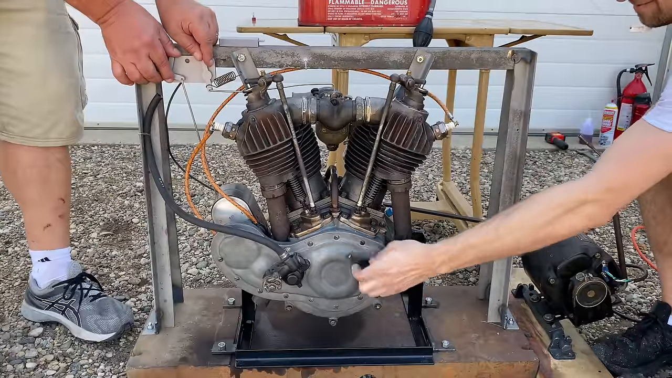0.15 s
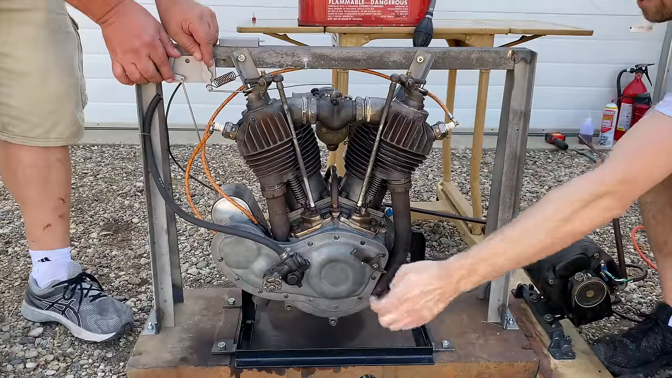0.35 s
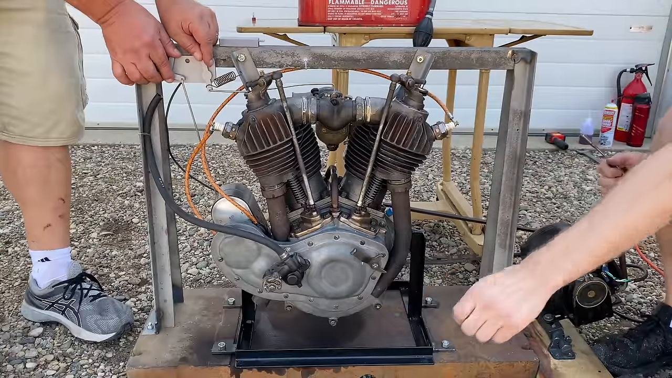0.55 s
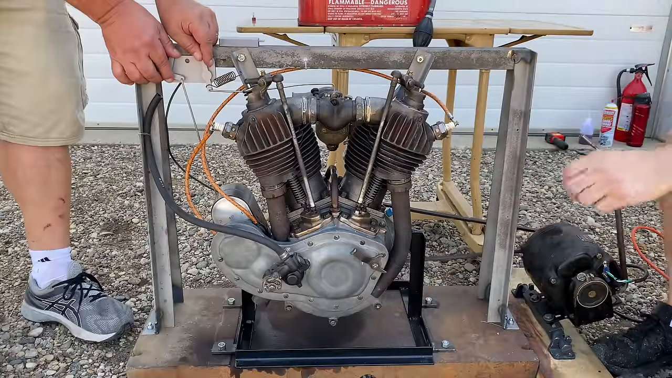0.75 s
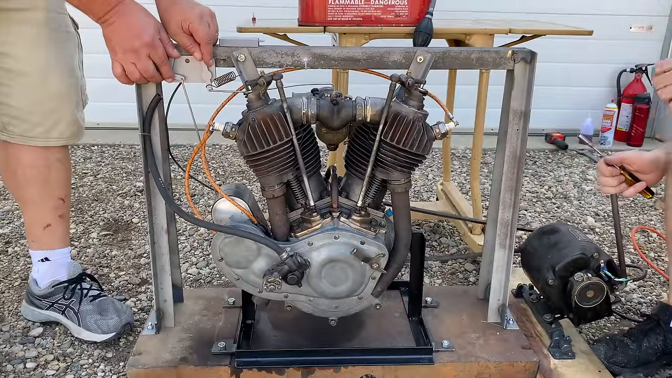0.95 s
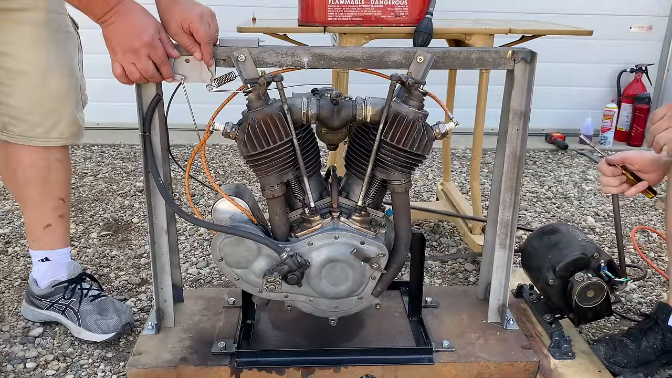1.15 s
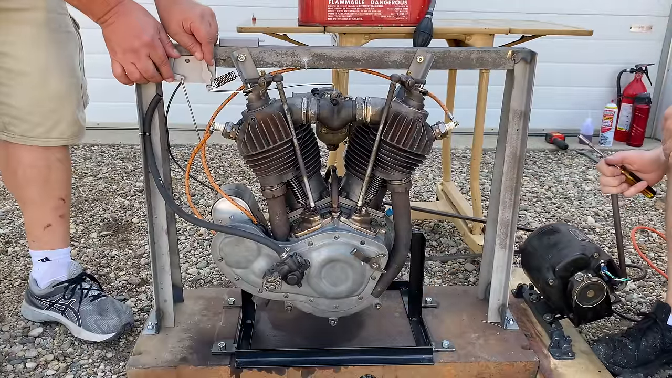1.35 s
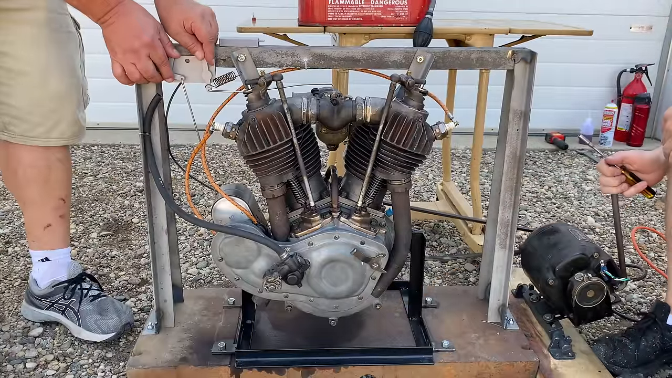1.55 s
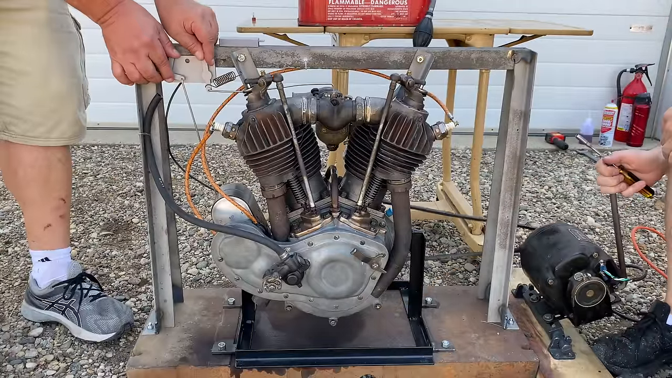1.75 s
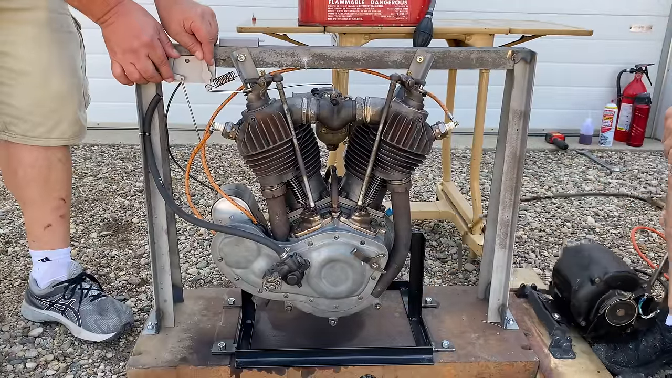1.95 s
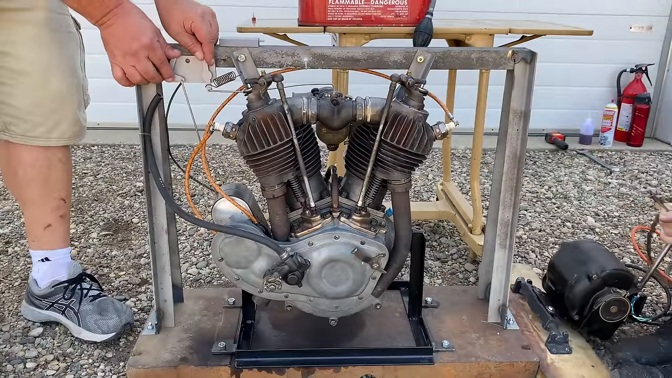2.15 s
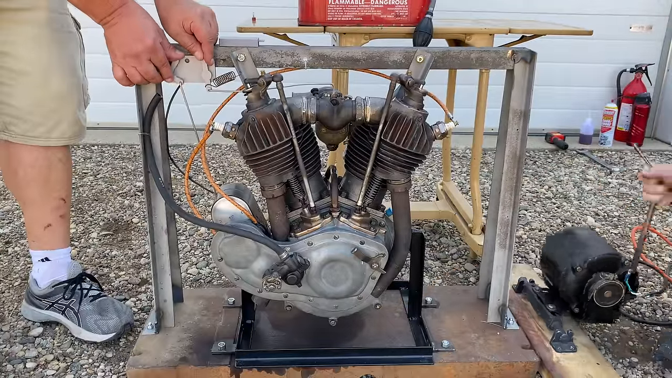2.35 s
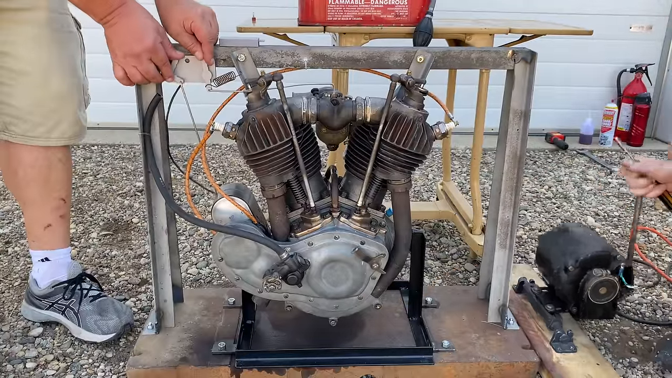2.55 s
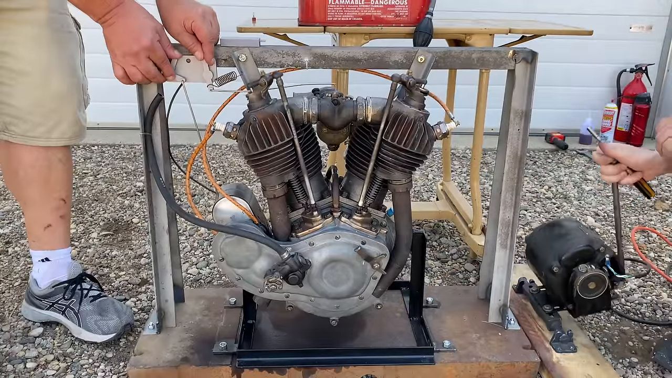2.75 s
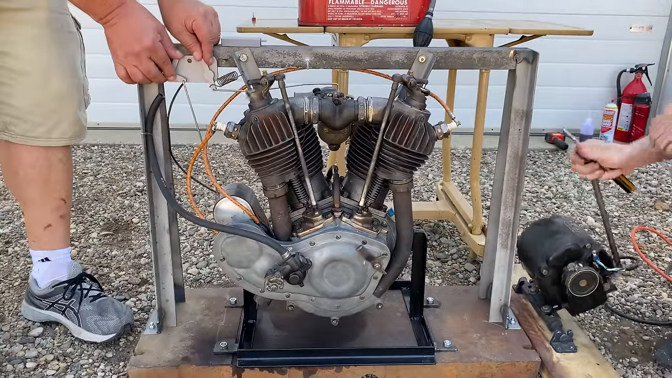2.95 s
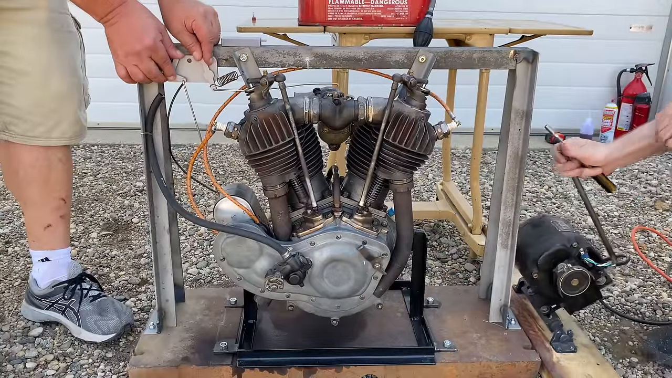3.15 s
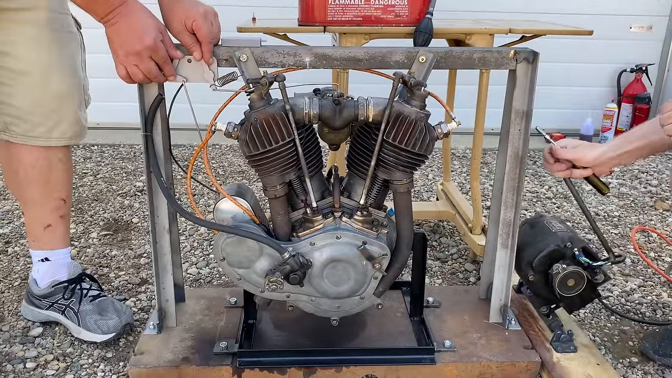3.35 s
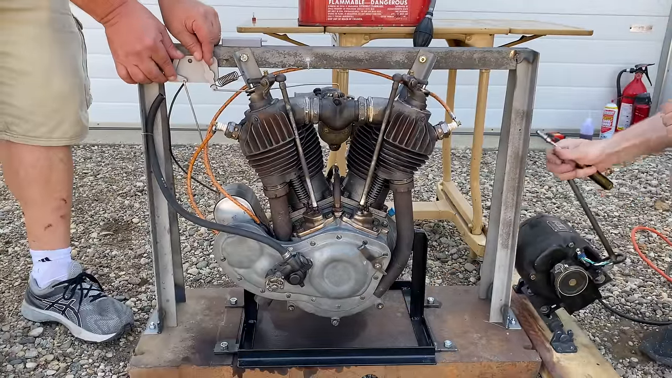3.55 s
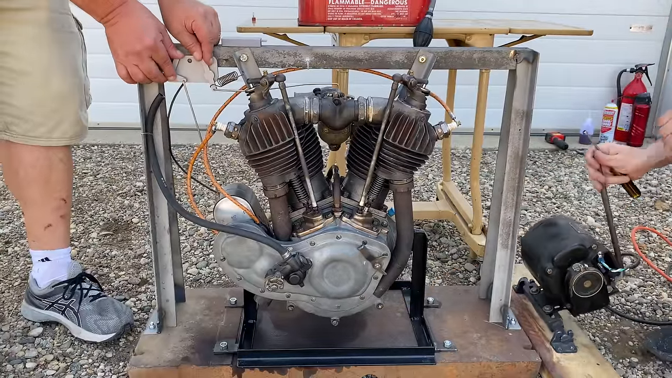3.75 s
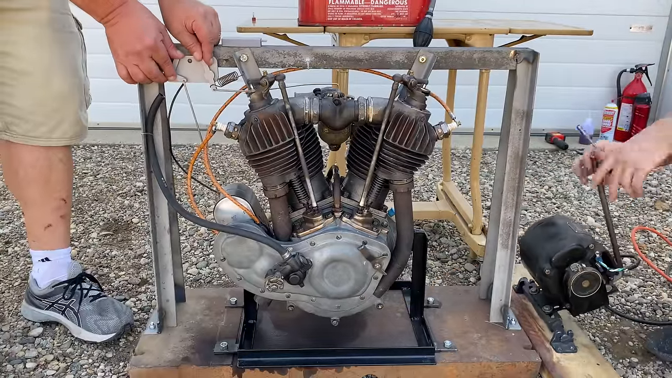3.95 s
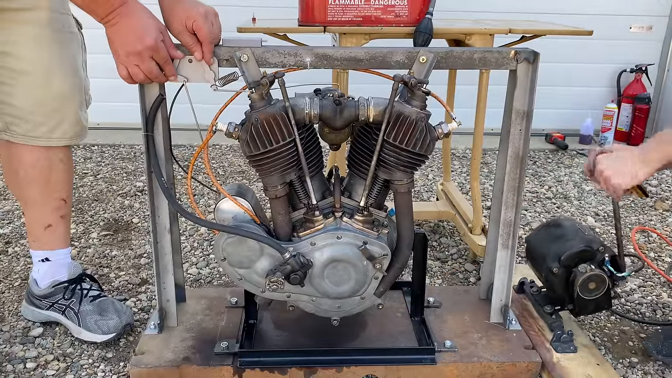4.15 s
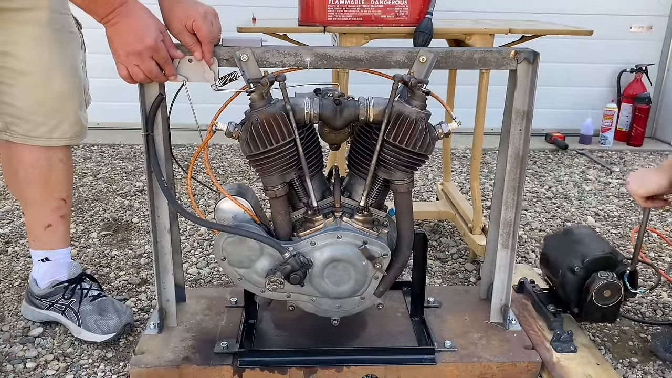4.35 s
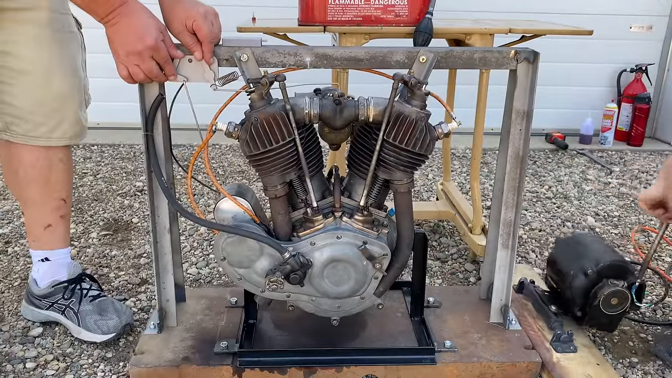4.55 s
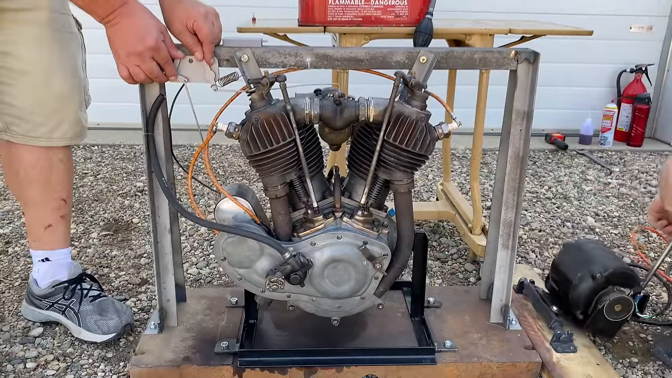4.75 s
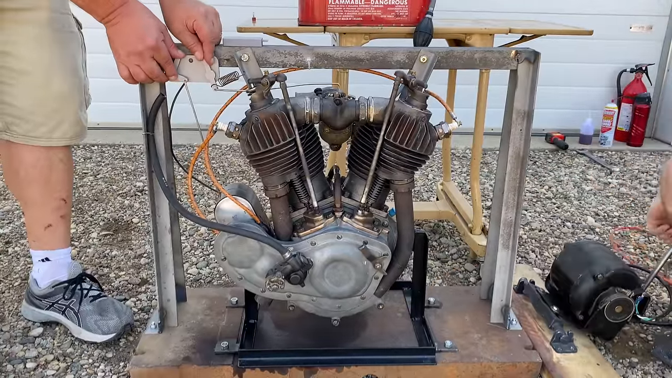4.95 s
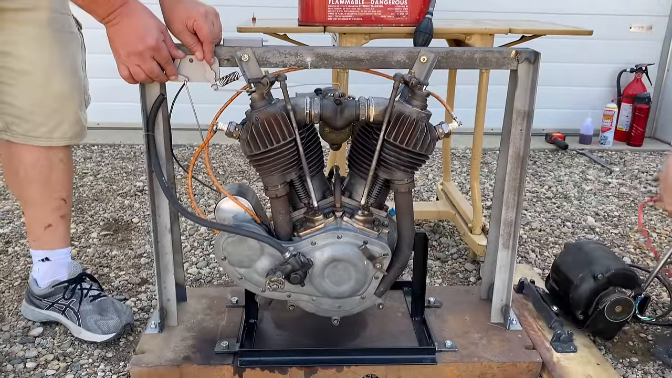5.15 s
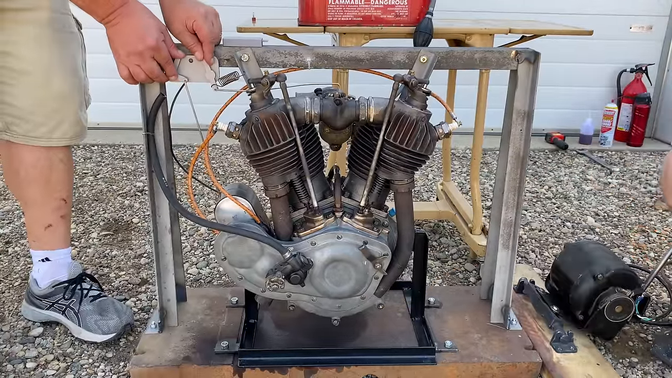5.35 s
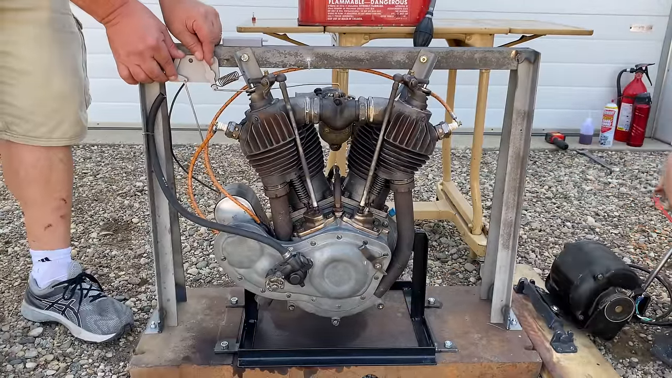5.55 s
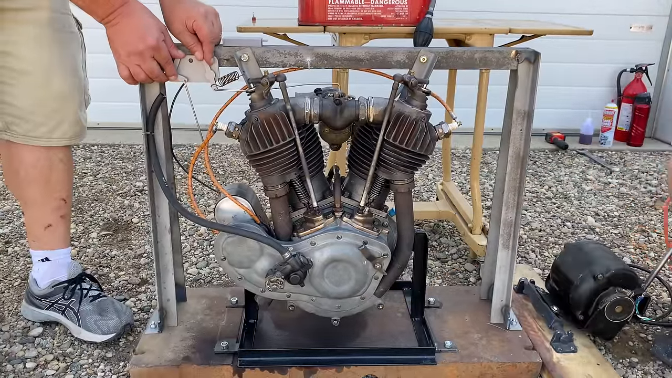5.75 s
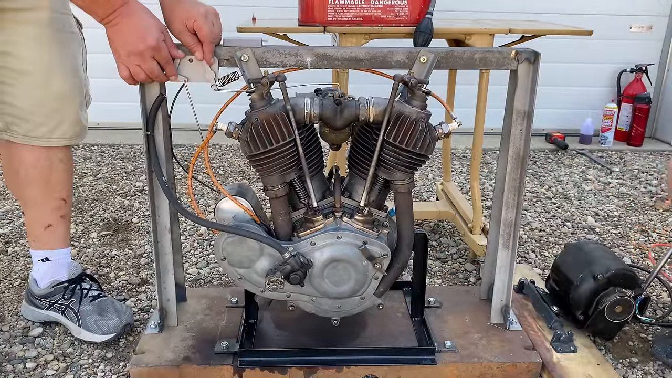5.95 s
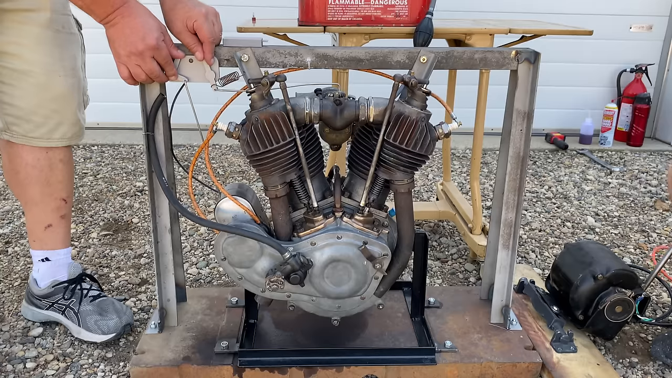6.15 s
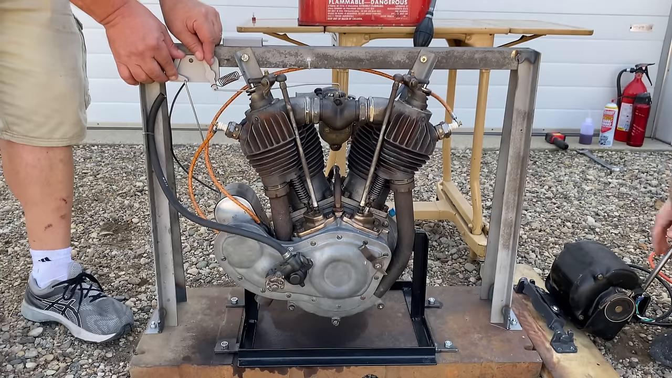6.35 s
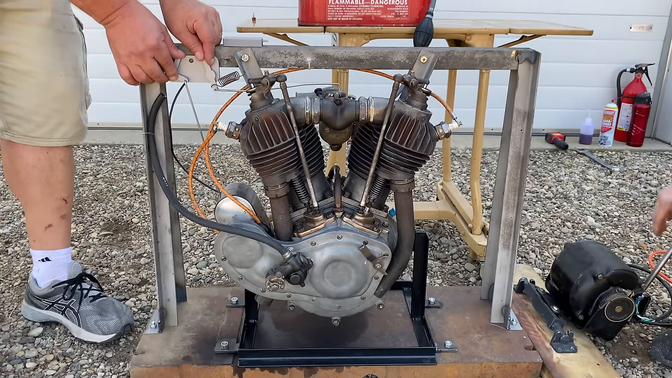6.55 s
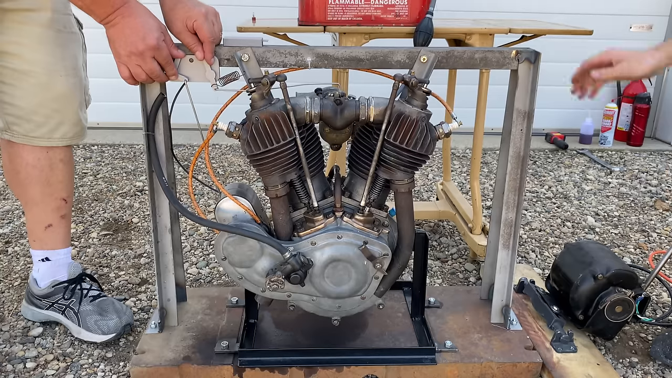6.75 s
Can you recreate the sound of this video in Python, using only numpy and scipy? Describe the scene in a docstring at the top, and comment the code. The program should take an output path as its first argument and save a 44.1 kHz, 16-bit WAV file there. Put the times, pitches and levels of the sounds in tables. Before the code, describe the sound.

An old V-twin engine is cranked with rubbing, ticking and hollow puffs, coughs twice, catches, then runs loud and lumpy outdoors.

```python
"""V-twin on a test stand

An electric motor spins an old V-twin on a steel stand outdoors on gravel: rubbing noise excites the castings,
each slow cycle has the same round of ticks, resonant noise bursts, and nearly all pump two hollow gliding puffs.
It coughs, catches, flares and runs on short open pipes: each firing is a thump in a jet of noise, and at speed
a swell of pipe resonances; some charges misfire. Gravel and a garage door answer faintly with decaying noise."""
import sys
import numpy as np
from scipy import signal
from scipy.fft import rfft, irfft, next_fast_len
from scipy.io import wavfile
from scipy.ndimage import uniform_filter1d

SR = 44100
rng = np.random.default_rng(int(sys.argv[2]) if len(sys.argv) > 2 else 0)


def digitize_waveform(pressure):
    """Quantize a signal to 16-bit integers and store it at the path in sys.argv[1].

    Rows of a 2-D input are taken as channels; values are limited to [-1, 1].
    """
    field = np.atleast_2d(pressure).T
    bounded = np.clip(field, -1, 1)
    quanta = np.round(bounded * 32767).astype(np.int16)
    wavfile.write(sys.argv[1], SR, quanta)


N = 299880

# crank progress from the moment the engine catches: time_s, four_stroke_cycles_done
CRANK_PROGRESS = [(1.9365, 0), (2.2278, 2), (2.3328, 3), (2.7992, 9), (3.3517, 17), (3.7787, 23),
                  (4.1273, 28), (4.2696, 30), (4.9618, 40), (5.9848, 55), (6.052, 56), (6.1843, 58),
                  (6.7826, 67)]
CATCH_S = CRANK_PROGRESS[0][0]
# lag of the second cylinder behind the first, as a share of the cycle
V_LAG = 315 / 720
# charges that burn badly or not at all: time_s, level_db (against a full firing)
MISFIRES = [(2.898, -9), (3.035, -35), (3.172, -10), (3.382, -41), (3.526, -7.5), (4.229, -6.5),
            (4.269, -38), (4.649, -32), (4.922, -38), (5.196, -38), (5.335, -6), (5.471, -30), (5.810, -37),
            (6.478, -31), (6.612, -31), (6.745, -7.5)]
# first and second cylinder when firing: crack_db, length_ratio, thump_db
CYLINDERS = [(2.5, 0.94, -12), (0.5, 1.29, -25)]
# lone firings while cranking: time_s, level_db, length_ratio (against a running firing), thump_db
COUGHS = [(0.795, 3.5, 2.5, -10.5), (1.81, -1, 2.9, -2.5)]
# gas column in cylinder and pipe at the idle rate: pitch_hz, level_db, fullest_s, steepness (of the swell)
PIPE_MODES = [(59.7, -19, 0.016, 2.6), (103.7, -14.5, 0.014, 4.8), (156, -28.5, 0.023, 2.9),
              (204, -26, 0.018, 3), (229.8, -32, 0.026, 4.7), (258.8, -22, 0.018, 7.4),
              (373.7, -26.5, 0.0055, 2.2)]
# slow cycles on the starter: start_s (first exhaust valve opens), first_puff_db, second_puff_db
SLOW_CYCLES = [(.317, -12, -16.5), (.668, -11.5, -8.5), (1.0, -17.5, -13), (1.342, -15.5, -20),
               (1.691, -15.5, -9.5)]
# puff of each cylinder on the starter: length_s
PUFF_LENGTHS = [.1, 0.075]
# rockers and tappets in every slow cycle: cycle_share, level_db (before load and scatter)
TICKS = [(.125, -31), (.25, -23), (.434, -24.5), (.66, -31), (.94, -30)]
# scrape of cams and linkage: cycle_share, level_db (before load), centre_hz, length_s
SCRAPES = [(0.391, -36.5, 257, 0.018), (0.398, -38.5, 640, 0.021), (0.832, -39.5, 825, 0.019),
           (0.966, -33.5, 245, 0.0099)]
# rubbing of the drive, hardest against each compression: cycle_share, level_db (before load)
DRAG = [(0, -36), (.17, -41), (.42, -33.5), (.6, -39), (.78, -38.5)]
# resonances of crankcase and fins: centre_hz, width_hz, level_db
CASTING_MODES = [(541, 86, 9), (1190, 540, -13.5), (2384, 22, 14.5), (2770, 280, -3), (3937, 230, 7.5),
                 (3910, 42, -1), (4180, 94, 1), (6200, 490, -3)]
# ringing modes of the steel stand: pitch_hz, level_db, t60_s
STAND_MODES = [(230, 1, 0.36), (2380, -12, 0.26), (3600, -8, 0.24), (4040, -34, 1.9), (5640, -9, 0.19)]
# spectrum of rubbing metal: frequency_hz, level_db
RUB_SPECTRUM = [(30, -24), (90, 1), (240, 5), (350, -3.5), (520, 6), (900, 1.5), (1200, 4.5), (1800, 0),
                (4000, -0.5), (7000, -7), (10000, -6.5), (15000, -11)]
# spectrum of escaping gas: frequency_hz, level_db
JET_SPECTRUM = [(30, 1), (130, 5.5), (250, 5.5), (420, 3), (650, -0.5), (950, -3.5), (1600, -5.5),
                (2500, -1), (3300, -5), (5000, -7), (8000, -11.5), (10000, -10.5), (14000, -15),
                (16000, -20.5)]
# spectrum of the shaking stand: frequency_hz, level_db
SHAKE_SPECTRUM = [(15, -52), (35, -10), (70, 6.5), (200, 14), (330, -1.5), (600, -7.5), (2000, -62)]
# phase between the two microphone ports: frequency_hz, left_lead_rad
PORT_PHASE = [(100, 0), (700, .4), (1800, -.2), (2200, 1.5), (2800, 2.7), (3600, 2.2), (4400, 1.4),
              (5100, 1.8), (5500, 4), (6500, 6.6), (7700, 9.7), (9000, 7.6), (10000, 6.3), (12100, 3.1),
              (13900, 0), (15900, -3.1)]
# likeness of noise at the two ports: frequency_hz, correlation
PORT_LIKENESS = [(100, 0.76), (300, 0.84), (600, 0.6), (1200, 0.43), (2500, 0.3), (4500, 0.45),
                 (8000, 0.39), (12000, 1)]
# level between the ports: frequency_hz, left_minus_right_db
PORT_LEAN = [(40, 8), (100, -3.5), (250, -1), (500, 0.5), (1000, 0.8), (3000, -3), (9000, -0.6)]
# decay of the yard's answer: frequency_hz, t60_s
YARD_DECAY = [(150, 0.13), (1500, 0.15), (12000, 0.011)]

TOP_HZ = 16300  # upper end of the band
# the engine flares up as it catches: settling time, then extra level of crack and boom
FLARE_S, FLARE_CRACK_DB, FLARE_BOOM_DB = 0.81, 4.5, 5.5
# cycles a second: the pipe pitches' reference, then the range where separate puffs merge into a boom
IDLE_RATE, PUFF_RATE, BOOM_RATE = 14.5, 7.4, 11.2
FIRST_CYCLE_S = -.02  # start of the cycle before the listed ones, which has ticks and scrapes but no puffs
# a puff glides from one pitch (before its waver), further when the gas is hot; cold ends are per cylinder
PUFF_HZ, COLD_END_HZ, HOT_END_HZ = 89, [198, 161], 289
EASE_DB_PER_S = 3.5  # the mechanism quietens as it frees up
SLACK_DB, SLACK_S = 5, 0.15  # after a cough the engine briefly outruns the drive


def amp(db):
    """Level: decibels become a pressure ratio."""
    return 10 ** (np.asarray(db) / 20)


def unit(x):
    """Normalisation: a signal is scaled to rms 1."""
    return x / np.sqrt(np.mean(x ** 2) + 1e-20)


def along(points, hz):
    """Interpolation of (frequency, value) points on a logarithmic frequency axis."""
    f, v = np.transpose(points)
    return np.interp(np.log(hz + 1), np.log(f + 1), v)


def filtered(x, response):
    """Linear filtering: the spectrum is multiplied by a complex response."""
    size = next_fast_len(N + SR // 2)
    hz = np.fft.rfftfreq(size, 1 / SR)
    return irfft(rfft(x, size) * response(hz), size)[..., :N]


def add(track, s, sound):
    """Superposition: a sound is summed into the track from time s on."""
    part = track[..., max(round(s * SR), 0):][..., :sound.shape[-1]]
    part += sound[..., :part.shape[-1]]


def band(hz, centre_hz, width_hz):
    """Resonance: one broad peak in frequency."""
    return 1 / (1 + ((hz - centre_hz) / width_hz) ** 2)


def mottle(hz, depth_db, count=28):
    """Spectral variation: a random ripple, weaker in the bass, colours each burst differently."""
    knots = np.linspace(0, np.sqrt(TOP_HZ), count)
    ripple = np.interp(np.sqrt(hz), knots, rng.standard_normal(count))
    return amp(depth_db * ripple * hz / (hz + 400))


def flutter(depth_db, size):
    """Amplitude modulation: a random gain of rms 1 changes about every size samples."""
    drift = unit(uniform_filter1d(rng.standard_normal(N), size))
    return unit(amp(depth_db * drift))


def rush(colour, size=N):
    """Partial coherence: mid and side noise of one colour give two channels of set likeness, rms 1."""
    hz = np.fft.rfftfreq(size, 1 / SR)
    turn = np.arccos(np.clip(along(PORT_LIKENESS, hz), 0, 1)) / 2
    weights = np.array([np.cos(turn), np.sin(turn)])
    noise = rfft(rng.standard_normal((2, size)))
    mid, side = irfft(noise * colour(hz) * weights, size)
    return unit(np.array([mid + side, mid - side]))


def swish(centre_hz, length, relative_width=0.25):
    """Resonant friction or flow noise: one swell, centred in a fifth of a second."""
    t = np.arange(-SR // 10, SR // 10) / SR
    noise = rush(lambda hz: band(hz, centre_hz, relative_width * centre_hz), len(t))
    return np.exp(-(t / length) ** 2) * noise


def crank_time(cycles):
    """Flywheel inertia: a natural cubic spline gives the times at which the engine reaches these cycles."""
    s, knots = np.transpose(CRANK_PROGRESS)

    def basis(c):
        """Spline basis: cubic distances to the knots plus a straight line."""
        return np.c_[abs(c[:, None] - knots) ** 3, np.ones(len(c)), c]

    rows = basis(knots)
    ends = np.c_[rows[:, -2:].T, np.zeros((2, 2))]
    weights = np.linalg.solve(np.r_[rows, ends], np.r_[s, 0, 0])
    return basis(cycles) @ weights


def firings():
    """Firing order: time, burn (dB) and cycle rate of each exhaust stroke; the V angle makes the beat limp."""
    whole = np.arange(CRANK_PROGRESS[-1][1] + 1)
    cycles = np.sort(np.r_[whole, whole[:-1] + V_LAG])
    times = crank_time(cycles)
    burn_db = np.zeros(len(times))
    for s, db in MISFIRES:
        burn_db[np.argmin(abs(times - s))] = db
    speed = .5 / (crank_time(cycles + .5) - times)
    return times, burn_db, speed


def flare(s):
    """Exponential settling: 1 as the engine catches, falling towards 0."""
    return np.exp(-(s - CATCH_S) / FLARE_S)


def merged(speed):
    """Fusion of pulses: 0 while strokes puff one by one, 1 when they are fast enough to boom."""
    return np.clip((speed - PUFF_RATE) / (BOOM_RATE - PUFF_RATE), 0, 1)


def turn_starts():
    """Periodicity: boundaries of the slow cycles, up to the moment the engine catches."""
    return np.r_[FIRST_CYCLE_S, np.transpose(SLOW_CYCLES)[0], CATCH_S]


def each_turn(share):
    """Cam timing: the moment in every slow cycle at which this share of it has passed."""
    starts = turn_starts()
    return starts[:-1] + share * np.diff(starts)


def load_db(s):
    """Mechanical load: the drive eases steadily and goes slack after each exhaust cough."""
    slack = sum((s > start) & (s < start + SLACK_S) for start, *_ in COUGHS)
    return EASE_DB_PER_S * (1 - s) - SLACK_DB * slack


def drag_db(s):
    """Friction under load: the rubbing level follows cam position and load."""
    starts = turn_starts()
    position = np.interp(s, starts, np.arange(len(starts)))
    return np.interp(position, *np.transpose(DRAG), period=1) + load_db(s)


def yard(x, delay=.008):
    """Scattering: gravel and garage door answer with noise that decays at a rate set by frequency."""
    hz, t, z = signal.stft(rng.standard_normal((2, SR // 3)), SR, nperseg=256)
    decay = amp(-60 * t / along(YARD_DECAY, hz)[:, None])
    tail = signal.istft(z * decay, SR, nperseg=256)[1]
    tail = np.pad(tail / np.linalg.norm(tail[0]), ((0, 0), (int(delay * SR), 0)))
    return signal.fftconvolve(x, tail, axes=1)[:, :N]


def buffet(level_db=-39, gust_db=2):
    """Flow noise: the running exhaust stirs the air independently at each port, with common gusts."""
    air = filtered(rng.standard_normal((2, N)), lambda hz: band(hz, 74, 25))
    running = np.interp(np.arange(N) / SR, [1.9, 2.3], [0, 1])
    return amp(level_db) * running * unit(air) * flutter(gust_db, size=6000)


def clank(s=.152, level_db=-23, snap_db=-11.5, snap_t60=0.048):
    """Impulse response: one sharp knock sets the modes of the steel stand ringing."""
    out, t = np.zeros((2, N)), np.arange(SR // 2) / SR
    ring = sum(amp(db - 60 * t / t60) * np.sin(2 * np.pi * hz * t) for hz, db, t60 in STAND_MODES)
    snap = amp(snap_db - 60 * t / snap_t60) * rng.standard_normal((2, len(t)))
    add(out, s, amp(level_db) * ring + snap)
    return out


def crankcase(hz):
    """Modal response: the castings' resonances sum with alternating sign."""
    return sum((-1) ** k * amp(db) * 1j * hz * width / (centre ** 2 - hz ** 2 + 1j * hz * width)
               for k, (centre, width, db) in enumerate(CASTING_MODES))


def metal(size, ripple_db, ring_db):
    """Contact excitation: rubbing noise drives the castings at new strengths each time."""
    plain = rush(lambda hz: amp(along(RUB_SPECTRUM, hz)) * mottle(hz, ripple_db), size)
    ringing = rush(lambda hz: crankcase(hz) * mottle(hz, ripple_db), size)
    return unit(plain + amp(ring_db) * ringing)


def cranking(ring_db=-8, ripple_db=3.5, grain_db=0.1, rumble_db=-46):
    """Sliding friction: the drive rubs over ever new spots while low noise shakes the stand."""
    out, size = np.zeros((2, N)), SR // 20
    window = np.sqrt(np.hanning(size))  # half-overlapping grains keep their power constant
    for s in np.arange(0, CATCH_S, size / 2 / SR):
        add(out, s, window * metal(size, ripple_db, ring_db))
    rumble = rush(lambda hz: band(hz, 66, 26) ** 2)
    level_db = uniform_filter1d(drag_db(np.arange(N) / SR), size=600)
    return amp(level_db) * out * flutter(grain_db, size=120) + amp(rumble_db) * rumble


def scrapes():
    """Friction in a resonance: short strokes come round with the cams."""
    out = np.zeros((2, N))
    for share, db, centre_hz, length in SCRAPES:
        for s in each_turn(share):
            add(out, s - 1 / 10, amp(db + load_db(s)) * swish(centre_hz, length))
    return out


def rattle(count=90, spread_db=3.5, t60=0.027, ripple_db=5.0, ring_db=-2):
    """Random impacts: loose parts chatter, louder where the drive drags harder."""
    out, t = np.zeros((2, N)), np.arange(SR // 25) / SR
    for when, size in rng.random((count, 2)):
        s = when * CATCH_S
        db = drag_db(s) - spread_db * np.log(0.049 + size)
        add(out, s, amp(db - 60 * t / t60) * metal(len(t), ripple_db, ring_db))
    return out


def ticks(rise=0.00039, t60=.075, ripple_db=4, ring_db=-3, scatter_db=1):
    """Periodic impacts: rockers and tappets click at the same cam positions in every slow cycle."""
    out, t = np.zeros((2, N)), np.arange(SR // 5) / SR
    for share, db in TICKS:
        for s in each_turn(share):
            peak_db = db + load_db(s) + scatter_db * rng.standard_normal()
            shape = amp(peak_db - 60 * t / t60) * (1 - np.exp(-t / rise))
            add(out, s, shape * metal(len(t), ripple_db, ring_db))
    return out


def clatter(whirr_db=-38, tappet_db=-31, tappet_delay=0.011, tappet_t60=0.0055, scatter_db=3, shake_db=-34):
    """Mechanical noise: gears whirr, tappets click and the stand shakes whether or not a charge burns."""
    times = firings()[0]
    running = np.interp(np.arange(N) / SR, [1.9, 2.4], [0, 1])
    taps, t = np.zeros(N), np.arange(SR // 10) / SR
    for s, size in zip(times, rng.standard_normal(len(times))):
        add(taps, s + tappet_delay, amp(tappet_db + scatter_db * size - 60 * t / tappet_t60))
    gears = unit(rush(lambda hz: amp(along(RUB_SPECTRUM, hz))) + .5 * rush(crankcase))
    shake = rush(lambda hz: amp(along(SHAKE_SPECTRUM, hz)))
    return running * ((amp(whirr_db) + taps) * gears + amp(shake_db) * shake)


def leak(s=1.793, level_db=-17, centre_hz=3300, length=0.0085):
    """Orifice noise: gas hisses past the lifting valve just before the last cough."""
    out = np.zeros((2, N))
    add(out, s - 1 / 10, amp(level_db) * swish(centre_hz, length))
    return out


def puff(length, end_hz, rise=0.0051, damping=1.93, overtone_db=-26, waver=0.1, push_db=-14, push_length=0.01):
    """Cavity resonance: the open cylinder rings like a bottle; the climbing piston shrinks it and lifts the pitch."""
    t = np.arange(int(length * SR)) / SR
    stroke = t / length
    unsteady = np.interp(stroke, np.linspace(0, 1, 6), rng.standard_normal(6))
    hz = (PUFF_HZ + (end_hz - PUFF_HZ) * stroke ** 2) * (1 + waver * unsteady)
    phase = 2 * np.pi * np.cumsum(hz) / SR
    valve = (1 - np.exp(-(t / rise) ** 2)) * np.minimum(1, 6 * (1 - stroke))
    push = amp(push_db) * np.exp(-(t / push_length - 1) ** 2)
    ring = np.exp(-damping * stroke) * (np.sin(phase) + amp(overtone_db) * np.sin(2 * phase))
    return valve * (push + ring)


def puffs(hot_delay=0.00684):
    """Displacement of gas: one puff per exhaust stroke of the listed cycles, cold, or hot behind a cough."""
    out = np.zeros(N)
    for (start, *levels), period in zip(SLOW_CYCLES, np.diff(turn_starts())[1:]):
        for lag, db, length, end_hz in zip([0, V_LAG], levels, PUFF_LENGTHS, COLD_END_HZ):
            s = start + lag * period
            for cough_s, *_ in COUGHS:
                if abs(cough_s - s) < period / 10:
                    s, end_hz = cough_s + hot_delay, HOT_END_HZ
            add(out, s, amp(db) * puff(length, end_hz))
    return out


def blast(s, stretch, rise=0.0022, fall=0.0038, bluntness=1.14, tail_db=-19, tail_t60=.11):
    """Jet discharge: start and envelope of a jet peaking at s, as the valve lifts and the pressure drains."""
    lead = SR // 50
    t = (np.arange(SR // 8) - lead) / SR
    jet = np.exp(-abs(t / np.where(t < 0, rise, fall) / stretch) ** bluntness)
    # the eddies build up twenty times faster than they die
    eddies = amp(tail_db - 60 * np.where(t < 0, -20 * t, t) / tail_t60)
    return s - lead / SR, np.hypot(jet, eddies)


def jet_noise(size, sizzle_db, tilt_db=2.4, ripple_db=2.8):
    """Turbulence: the noise of one shot; a cold, rich charge sizzles more in the treble."""
    treble_db = sizzle_db + tilt_db * rng.standard_normal()

    def colour(hz):
        """Jet spectrum: a treble tilt and a random ripple shape each shot."""
        return amp(along(JET_SPECTRUM, hz) + treble_db * hz / 10000) * mottle(hz, ripple_db)

    return rush(colour, size)


def thump(hz, length):
    """Pressure pulse: the swing of a firing, centred in a fiftieth of a second."""
    t = np.arange(-SR // 100, SR // 100) / SR
    return np.exp(-(t / length) ** 2) * np.sin(2 * np.pi * hz * t)


def spit_back(s=0.94, level_db=-17.0, stretch=2, sizzle_db=8, hoot_db=-13, hoot_hz=725, hoot_t60=.04,
              rasp_db=-26, puff_db=-25):
    """Reverse flow: one charge spits back through the intake, which hoots, rasps and puffs."""
    out, t = np.zeros((2, N)), np.arange(SR // 8) / SR
    start, shape = blast(s, stretch)
    add(out, start, amp(level_db) * shape * jet_noise(len(shape), sizzle_db))
    hoot_shape = amp(hoot_db - 60 * t / hoot_t60) * (1 - np.exp(-t / 0.0013))
    add(out, s - .004, hoot_shape * np.sin(2 * np.pi * hoot_hz * t))
    add(out, s + 0.0061 - 1 / 10, amp(rasp_db) * swish(centre_hz=2450, length=0.0098))
    add(out, s, amp(puff_db) * puff(length=.067, end_hz=120))
    return out


def coughs(level_db=-12, sizzle_db=8, crackle_db=2, thump_hz=270, thump_length=0.0053):
    """Isolated discharge: stray charges burn during cranking and spit out of the exhaust."""
    spit, thumps = np.zeros((2, N)), np.zeros(N)
    for s, db, stretch, thump_db in COUGHS:
        start, shape = blast(s, stretch)
        add(spit, start, amp(db) * shape * jet_noise(len(shape), sizzle_db))
        add(thumps, s - .006, amp(db + thump_db) * thump(thump_hz, thump_length))
    return amp(level_db) * (spit * flutter(crackle_db, size=50) + thumps)


def chuffs(level_db=-5.5, second_db=-3, delay=.006, share=.31, end_hz=310, gargle_db=-27, gargle_hz=700,
           gargle_t60=.13):
    """Slow exhaust pulses: early firings each give a hot puff, and the cold pipe gargles behind it."""
    out, t = np.zeros((2, N)), np.arange(SR // 8) / SR
    for k, (s, burn_db, speed) in enumerate(zip(*firings())):
        gain = amp(level_db + burn_db + second_db * (k % 2)) * np.sqrt(1 - merged(speed))
        add(out, s + delay, gain * puff(share / speed, end_hz, damping=1.9, waver=.1))
        gargle = rush(lambda hz: band(hz, gargle_hz, gargle_hz), len(t))
        add(out, s, amp(gargle_db + burn_db - 60 * t / gargle_t60) * flare(s) * gargle)
    return out


def booms(level_db=0.27, lead=0.004254, scatter_db=2.5, detune=0.018, unburnt_db=-17, pitch_law=0.69):
    """Gas-column resonance: firings swing cylinder and pipe; speed raises the pitch and heat varies it a little."""
    out, t = np.zeros(N), np.arange(SR // 8) / SR
    hz, db, fullest, steep = np.transpose(PIPE_MODES)[:, :, None]
    for s, burn_db, speed in zip(*firings()):
        size, heat = rng.standard_normal((2, len(PIPE_MODES), 1))
        swell = (t / fullest * np.exp(1 - t / fullest)) ** steep
        pitch = (speed / IDLE_RATE) ** pitch_law * (1 + detune * heat)
        ring = amp(db + scatter_db * size) * swell * np.sin(2 * np.pi * hz * pitch * t)
        # the boom of a misfire never falls below a floor
        gain = amp(level_db + FLARE_BOOM_DB * flare(s) + max(burn_db, unburnt_db))
        add(out, s - lead, gain * np.sqrt(merged(speed)) * ring.sum(0))
    return out


def cracks(level_db=-12.5, scatter_db=0.61, length_scatter=0.014, cold_db=5, thump_hz=380, thump_length=0.0031,
           crackle_db=2.25):
    """Exhaust blowdown: every firing leaves the pipe as a pressure thump wrapped in turbulence."""
    jet, thumps = np.zeros((2, N)), np.zeros(N)
    for k, (s, burn_db, speed) in enumerate(zip(*firings())):
        crack_db, stretch, thump_db = CYLINDERS[k % 2]
        size, length, pitch = rng.standard_normal(3)
        gain = amp(burn_db + FLARE_CRACK_DB * flare(s) + scatter_db * size)
        start, shape = blast(s, stretch * np.exp(length_scatter * length))
        cold = np.interp(s, [2.3, 2.8], [1, 0])
        add(jet, start, gain * amp(crack_db) * shape * jet_noise(len(shape), cold_db * cold))
        swing = thump(thump_hz * np.exp(.05 * pitch), thump_length)
        add(thumps, s - len(swing) / 2 / SR, gain * amp(thump_db - 4.4 * cold) * swing)
    return amp(level_db) * jet * flutter(crackle_db, size=24) + thumps


def scene(yard_db=-20):
    """Superposition: the engine, the yard's answer and the stirred air sum."""
    rig = cranking() + scrapes() + rattle() + ticks() + clank()
    turning = rig + leak() + puffs() + spit_back() + coughs()
    engine = turning + clatter() + chuffs() + booms() + cracks()
    return engine + amp(yard_db) * yard(engine) + buffet()


def record(dry, low_cut_hz=22):
    """Spaced reception: ports differ in phase and level; deep bass is cut, peaks clip, the band ends steeply."""
    sides = np.array([[.5], [-.5]])  # left, right

    def ports(hz):
        """Transfer function: level is shared between the sides, phase shifts the right one."""
        return amp(sides * along(PORT_LEAN, hz)) * np.exp(1j * (sides - .5) * along(PORT_PHASE, hz))

    heard = filtered(dry, lambda hz: ports(hz) * hz ** 2 / (hz ** 2 + low_cut_hz ** 2))
    return filtered(np.clip(heard, -.9, .9), lambda hz: hz < TOP_HZ)


dry = scene()
out = record(dry)
digitize_waveform(out)
```